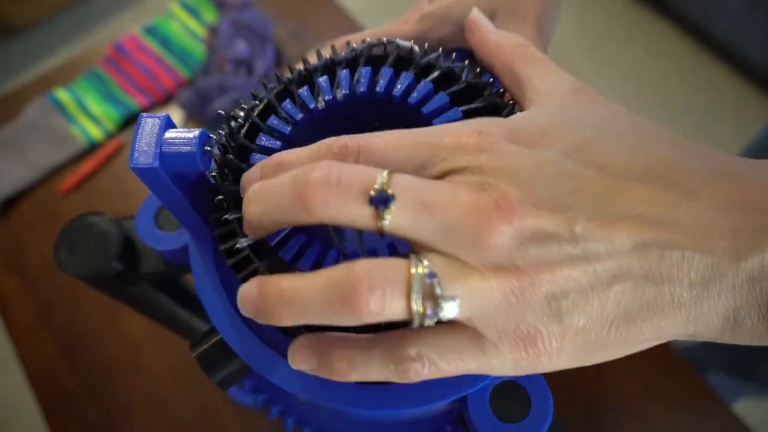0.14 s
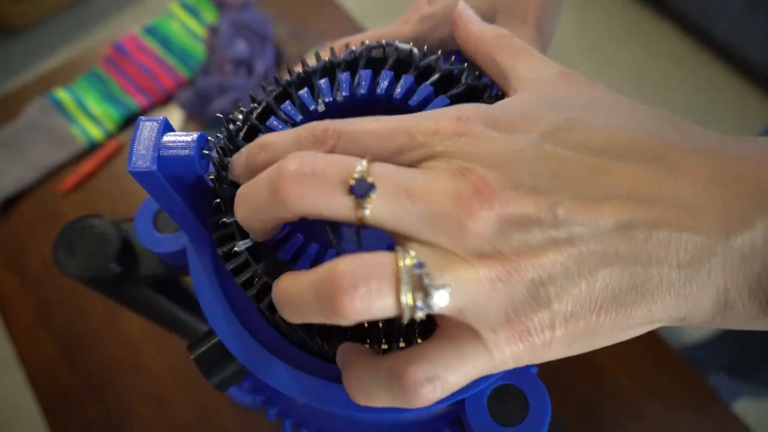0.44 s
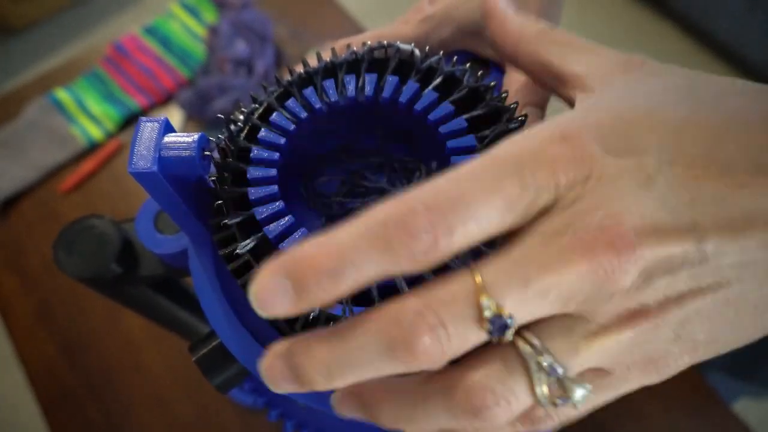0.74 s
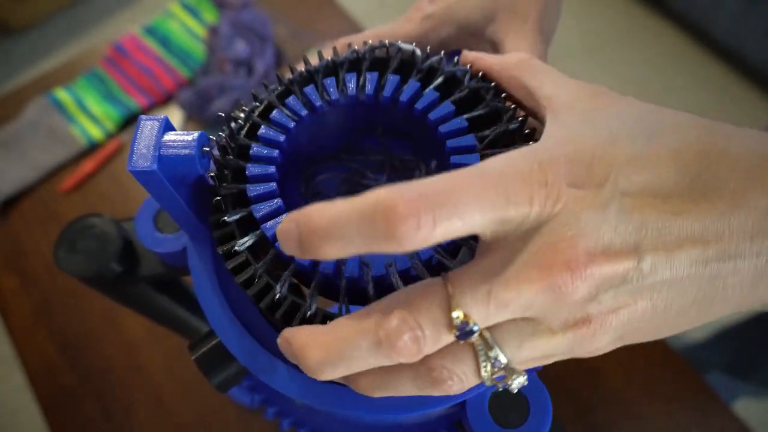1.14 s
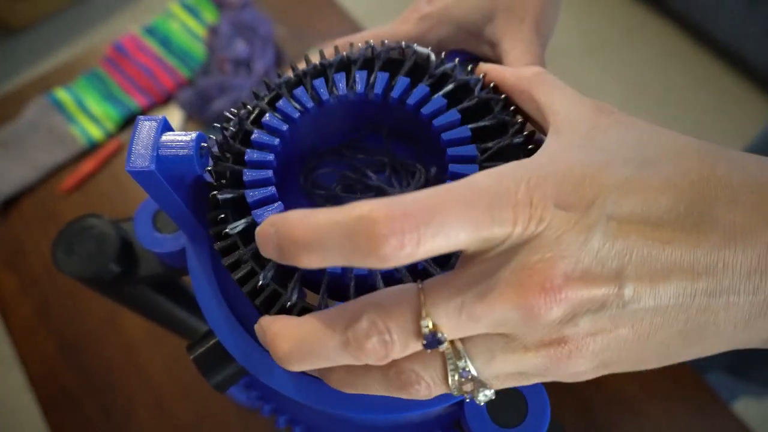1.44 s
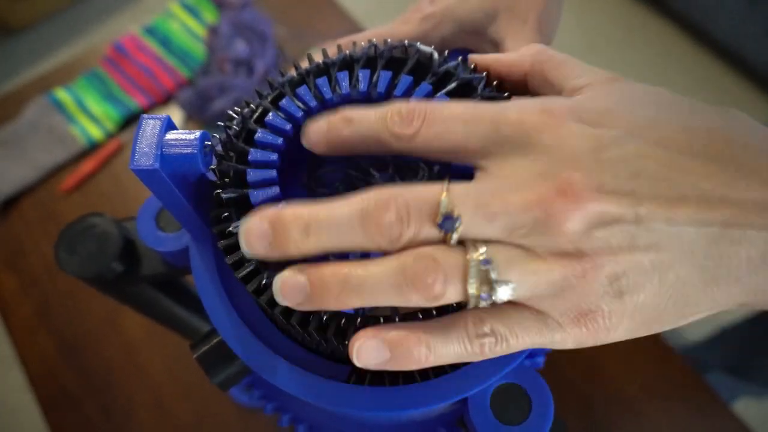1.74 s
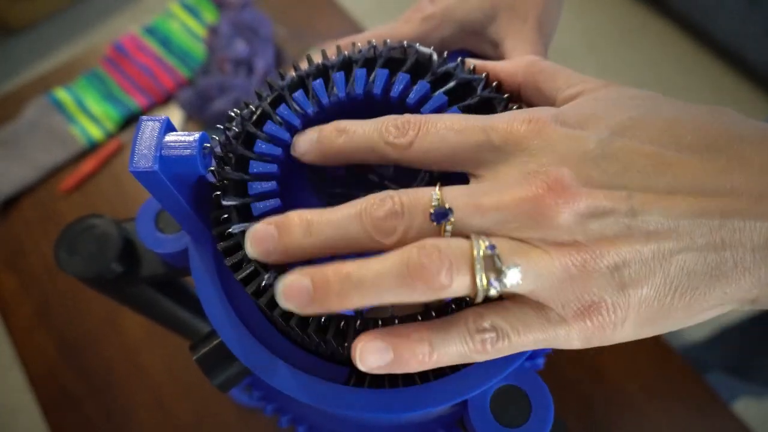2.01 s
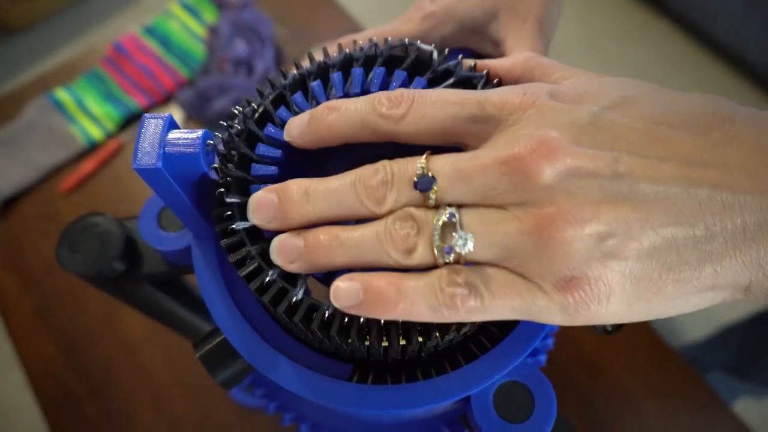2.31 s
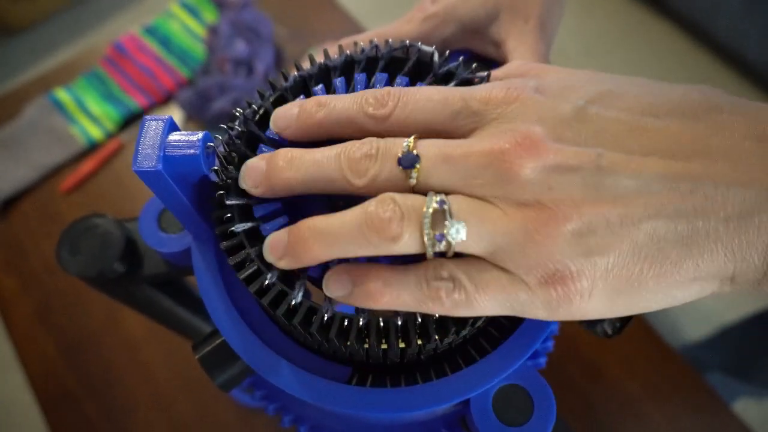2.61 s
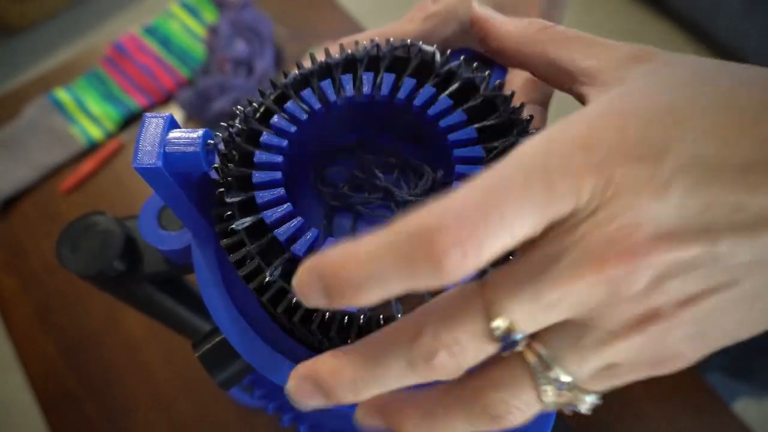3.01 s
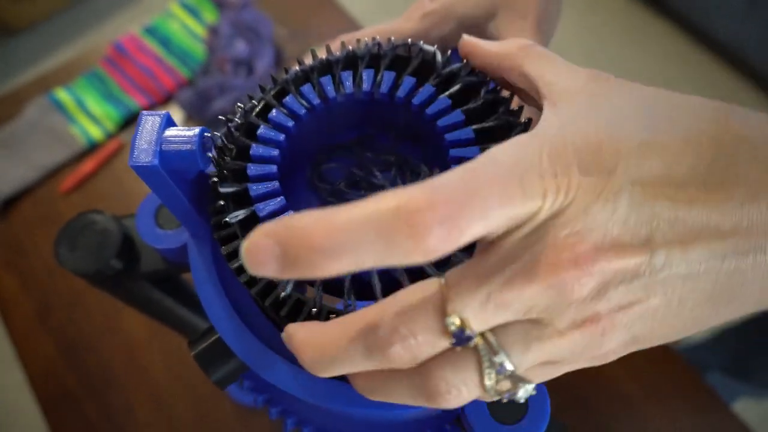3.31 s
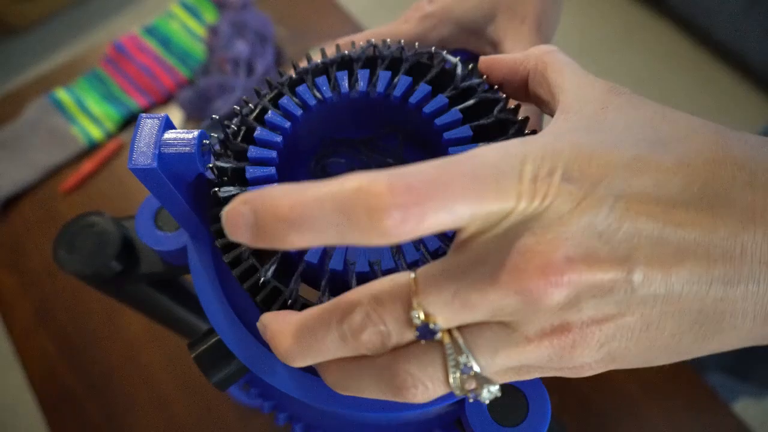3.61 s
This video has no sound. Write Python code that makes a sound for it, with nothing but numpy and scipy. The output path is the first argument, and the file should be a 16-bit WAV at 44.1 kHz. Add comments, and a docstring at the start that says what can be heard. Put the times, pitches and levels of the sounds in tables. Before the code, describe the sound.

Needles of a small plastic knitting machine click and rattle under a turning hand: one early click, a dense burst, scattered ticks, then a stronger clatter; soft table knocks, small furnished room, close phone microphone.

```python
"""A small furnished room with a wooden table, heard through a phone lying close by.
A hand turns the needle ring of a small plastic knitting machine. Needles click as short noise bursts,
rattle in swarms of random ticks, and drag in their slots as gated noise, all through tuned resonances.
The frame knocks the table top, struck as a set of decaying modes; noise echoes make the room's brief answer.
Underneath lie a quiet shaped-noise hiss, a thin whine and a low rumble that comes and goes."""
import sys
import numpy as np
from scipy import signal
from scipy.fft import rfft, irfft
from scipy.io import wavfile
from scipy.ndimage import uniform_filter1d

SR = 44100
rng = np.random.default_rng(int(sys.argv[2]) if len(sys.argv) > 2 else 0)


def generate_wav(signal):
    """Clip the signal to [-1, 1] and save it as 16-bit WAV at the path in sys.argv[1]."""
    frames = np.transpose(np.atleast_2d(signal))
    scaled = np.clip(frames, -1, 1) * 32767
    pcm = np.round(scaled).astype(np.int16)
    wavfile.write(sys.argv[1], SR, pcm)


N = 165375  # length [samples]

# Needle clicks: (time [s], slot level [dB], plastic ring level before crest trim [dB],
# treble level before crest trim [dB], pitch [Hz], ring pitch [Hz], left minus right [dB], length [ms])
NEEDLE_CLICKS = [(0.1138, -14.5, -25, -24.5, 3940, 1330, 0, 7.4),
                 (0.153, -54, -61, -45, 5000, 1450, 5, 6.7), (0.1713, -24.5, -26, -28, 3370, 1360, 2, 7.3),
                 (0.1984, -37, -51, -62, 2070, 1920, -6, 7), (0.3853, -63, -43, -57, 5020, 1580, 1, 9.3),
                 (0.417, -36, -57, -44, 4460, 1560, 3, 4.1), (0.455, -47, -41.5, -65, 3430, 1270, -1, 10),
                 (0.4998, -68, -48, -65, 3130, 1880, -3, 6.7), (0.517, -39, -49, -47, 4400, 1900, 1.0, 3.2),
                 (0.5348, -37, -39.5, -48, 4300, 1600, 0, 5.5),
                 (0.559, -47.5, -41, -70, 2520, 1800, -2, 5.9), (0.606, -50, -41, -62, 2550, 1520, 1, 8.8),
                 (0.6697, -43.5, -57, -72, 3180, 1620, 0.0, 7), (0.7015, -43, -41, -69, 4450, 1750, -1, 6),
                 (0.714, -44, -45, -50, 2660, 1500, 0, 5.1), (0.9658, -65, -33.5, -85, 2400, 1470, -5, 9.7),
                 (1.169, -36, -40.5, -50, 3500, 1370, 0, 3.3), (1.1828, -36, -44, -50, 4300, 1450, 2, 6),
                 (1.1964, -47, -63, -67, 3510, 1430, -1.0, 4.2), (1.2173, -41, -51, -63, 3560, 1390, -1, 6),
                 (1.2273, -32, -33, -48, 2960, 1320, -10, 6.2),
                 (1.238, -18.5, -48, -32, 4200, 1360, 7, 9.3), (1.257, -29, -23, -48, 2970, 1340, -6, 9),
                 (1.2693, -19, -29.5, -13, 3920, 1300, -0.5, 6.4),
                 (1.2792, -24.5, -58, -50, 3770, 1230, 12, 4.3),
                 (1.323, -30, -35, -39, 3250, 1390, 12, 8.4),
                 (1.3515, -15.5, -49, -15.5, 4100, 1900, 3, 8.5),
                 (1.3618, -26, -33, -33, 4050, 1500, -18, 7.44),
                 (1.3688, -19, -24.5, -21, 4830, 1380, 3, 6.8), (1.4043, -21, -35, -61, 3480, 1600, -2, 4),
                 (1.4726, -33.5, -46, -46, 4300, 1940, 2, 9.6),
                 (1.5212, -39.5, -48, -72, 4980, 1250, 4, 6.5),
                 (1.5845, -32, -45, -41.5, 4230, 1520, 0, 4.6),
                 (1.8138, -47.5, -41.5, -53, 2640, 1660, 0, 7.1),
                 (1.8603, -22, -38, -32.5, 3860, 1270, 0.5, 3.8), (1.91, -46, -67, -59, 3120, 1480, 5, 5.8),
                 (1.9485, -20.5, -19, -27, 3400, 1440, -2, 3.8),
                 (1.954, -20, -28.5, -18, 3780, 1230, 7.5, 4.6), (2.051, -48, -56, -49, 2740, 1530, 2, 7.3),
                 (2.074, -42, -30.5, -39, 3500, 1650, 1, 5.6),
                 (2.1856, -39, -63, -71, 3480, 1740, 1.0, 2.7),
                 (2.2127, -32.5, -39, -38.5, 4540, 1690, 0, 5),
                 (2.2367, -38.5, -40, -44, 4570, 1600, 0, 7.6),
                 (2.2745, -47.5, -45.5, -71, 4340, 1440, 0, 8.7),
                 (2.3239, -24, -35.5, -17.5, 4400, 1500, 0.5, 5.2),
                 (2.412, -48, -58, -55, 2760, 1630, -3, 8), (2.497, -33, -40, -46, 4480, 1540, 2.5, 4.6),
                 (2.5306, -38, -59, -46, 3470, 1600, 3, 6), (2.5532, -38, -37, -55, 5500, 1630, 1, 5.4),
                 (2.569, -38, -49, -37, 4400, 1540, 1.5, 6.8), (2.589, -34.5, -51, -39, 3550, 1620, 3, 6.6),
                 (2.6584, -49.5, -48, -68, 3550, 1450, -4, 8.8),
                 (2.688, -48.5, -61, -70, 3320, 1350, -0.5, 6), (2.7897, -51, -47, -68, 2710, 1690, 2, 7.1),
                 (2.8106, -33, -55, -41, 3400, 1460, 0.5, 6), (2.8285, -29, -39, -36, 4640, 1380, 1.0, 5.3),
                 (2.8702, -25, -60, -29, 4700, 1400, 1, 5.9),
                 (2.8835, -33.5, -45, -51, 2900, 1390, -1, 6.5),
                 (2.9147, -37.5, -55, -42.5, 4700, 1520, 5, 4.3),
                 (3.2204, -46, -47, -71, 3600, 1530, -5, 12), (3.272, -54, -38, -75, 2820, 1280, -4, 8.5),
                 (3.3006, -36.5, -37, -69, 3750, 1480, -4, 7), (3.327, -25, -34, -41, 4370, 1600, 0, 7),
                 (3.352, -18, -54, -11, 4500, 1540, 1, 6.8), (3.3735, -36, -58, -49, 3800, 1840, -26, 7.4),
                 (3.4356, -43, -41, -41, 3520, 1900, 3, 10.8), (3.453, -46, -31, -48, 2910, 1500, -12, 5.9),
                 (3.4731, -28.5, -41, -42, 4300, 1270, 13, 6.5),
                 (3.496, -22.5, -24.5, -41, 3680, 1360, 3, 5),
                 (3.5242, -21.5, -27.5, -34, 4100, 1320, -7.5, 4.8),
                 (3.5275, -23, -38, -18.5, 6050, 1390, -3, 3.5),
                 (3.532, -17, -45, -12.5, 4870, 1390, 5, 7.4), (3.5666, -21, -41, -36, 3800, 1440, 4, 7.4),
                 (3.5931, -13, -30, -13.5, 4060, 1600, 0.5, 6.3), (3.625, -25, -36, -32, 3870, 1630, 5, 4),
                 (3.6448, -24, -32, -47, 4770, 1500, -0.5, 9.6),
                 (3.6487, -24.5, -50, -32, 4570, 1440, 9, 7.5), (3.6702, -24, -40, -26, 4360, 1520, 0, 4.4),
                 (3.7444, -37.5, -51, -48, 3500, 1200, 3, 5.7)]
# Rattle of the needle swarm: (time [s], level [dB], treble level [dB])
SWARM_LEVELS = [(0, -60.5, -68), (.105, -61, -69), (.125, -44, -58), (.2, -62.5, -58.5), (.255, -57, -66),
                (.275, -66.5, -69), (.55, -61, -68), (.62, -65, -70), (.73, -71, -72), (.8, -79, -79),
                (1.14, -73, -70), (1.19, -57.5, -91), (1.22, -54.5, -68), (1.235, -35, -50),
                (1.26, -32, -43), (1.29, -39.5, -44), (1.315, -47, -60), (1.33, -31, -46),
                (1.385, -39, -42.5), (1.42, -44.5, -65), (1.45, -60, -66), (1.55, -66.5, -70),
                (1.65, -71, -73), (1.8, -72, -71), (1.88, -58, -65), (2.06, -60.5, -72), (2.2, -59.5, -67),
                (2.42, -64, -68), (2.58, -55.5, -67), (2.68, -69, -72), (2.78, -66, -74),
                (2.84, -53.5, -66), (2.94, -65, -66.5), (3.05, -86, -74), (3.2, -74, -74), (3.27, -64, -70),
                (3.31, -48.5, -71.5), (3.335, -41.5, -82), (3.36, -39.5, -42), (3.4, -39, -53),
                (3.43, -49.5, -69), (3.47, -35.5, -51), (3.51, -42.5, -65), (3.53, -36.5, -43),
                (3.575, -33, -40.5), (3.587, -44.5, -64), (3.61, -42, -48), (3.665, -41, -49),
                (3.685, -50.5, -61), (3.75, -63, -63)]
# Needle drags in a slot: (time [s], length [s], level [dB], treble level [dB], plastic ring level [dB])
NEEDLE_DRAGS = [(0.058, 0.036, -54.5, -60, -59.5), (0.316, 0.015, -49, -54, -52),
                (0.397, 0.048, -65, -67, -57), (0.635, 0.048, -62, -73, -59.5),
                (2.089, 0.0082, -53.5, -74, -37), (2.109, 0.026, -35, -32.5, -31.5),
                (2.124, 0.028, -40.5, -54, -61.5), (2.438, 0.016, -36, -44, -45.5),
                (2.589, 0.02, -51, -62, -50.5)]
# Knocks on the table: (time [s], level [dB], low mode share [dB], upper modes share [dB],
# dull thud share [dB])
TABLE_KNOCKS = [(0.12, -35, -4, -6.5, -15), (0.173, -35, -1, -6.5, -14), (0.199, -38.5, 28.5, -30, -37),
                (0.548, -45, -6, 0.5, -12.5), (0.664, -46.5, -13, -3, -28), (0.966, -34, -12, -5.5, -9.5),
                (0.989, -60, 0.0, 6, 8.5), (1.031, -62, 0.0, 0, 4), (1.226, -50.5, -10, 8, 3),
                (1.245, -42, -15, 9, -9), (1.267, -37, -10, -2, -25), (1.285, -38.5, 0, 3, -21),
                (1.344, -40.5, 5, 6.5, -5.5), (1.551, -53.5, -3, 5, -24), (1.95, -25, 2, -4.5, -15),
                (2.55, -45.5, -4, 1.5, -24), (2.677, -58.5, -9, 11.5, -4), (2.831, -38.5, -4, 3.5, -7.5),
                (2.891, -25.5, -12, -9.5, -23), (2.947, -33, -8, 4, -22.5), (3.332, -51, -3, 1, -6),
                (3.542, -44, -11, 7.5, 1), (3.59, -52.5, -6, 11.5, -23)]

# Slot resonances: (frequency [Hz], width [Hz], level [dB])
SLOT_BANDS = [(2855, 940, 15.5), (3358, 600, 18), (4070, 840, 12), (5070, 460, 14.5), (5510, 1640, 10.5)]
# Modes of the plastic ring: (frequency [Hz], level [dB], T60 [s])
RING_MODES = [(1371, 10, 0.037), (1486, 17.5, 0.035), (1622, 21.5, 0.015), (1866, -2.5, 0.085)]
# Treble resonances of the needles: (frequency [Hz], width [Hz], level [dB])
TREBLE_BANDS = [(7300, 260, 8), (9610, 5400, 16), (15000, 1000, 12)]
# Resonances of a drag: (frequency [Hz], width [Hz], level [dB])
DRAG_BANDS = [(2726, 220, 3), (3230, 180, 2.5), (4420, 350, -9.5), (5450, 540, 1), (6500, 380, -10)]
# Treble resonances of a drag: (frequency [Hz], width [Hz], level [dB])
DRAG_TREBLE_BANDS = [(5930, 840, -2), (8600, 720, 0), (11300, 1800, 1.5), (13900, 1200, -1)]
# Modes of the table top: (frequency [Hz], level before a knock's shares [dB], T60 when knocked [s])
TABLE_MODES = [(80, -24, 0.21), (146, -2.5, 0.26), (158, -30.5, 0.2), (223, -13, 0.15), (271, -2, 0.12),
               (296, -6.5, 0.12), (360, -12, 0.18), (449, -21.5, 0.2), (571.5, -16.5, 0.14),
               (712, -7, 0.02), (822, -5, 0.046)]

# Hiss spectrum: (frequency [Hz], relative density [dB per Hz])
HISS_SPECTRUM = [(15, -34), (25, -66), (87, -2.5), (180, -6.5), (439, -9.5), (531, -14), (734, -13),
                 (1330, -17), (1940, -17.5), (2220, -20), (16000, -31)]
# Stereo width of the hiss: (frequency [Hz], side minus mid [dB])
HISS_WIDTH = [(60, -4), (110, -8.5), (200, -2.5), (380, 0), (700, 3), (1290, 2.5), (2380, 0.5), (4400, 1),
              (8120, 1), (15000, 1)]
# Low rumble: (time [s], level [dB])
RUMBLE_LEVELS = [(0.0, -60), (0.07, -65), (0.12, -39), (0.22, -46.5), (0.28, -55.5), (0.66, -66),
                 (0.69, -53), (0.92, -70), (1.4, -58), (1.6, -71), (2.0, -51), (2.16, -62), (2.28, -52.5),
                 (2.43, -73), (2.64, -52), (2.79, -68), (2.84, -52), (2.98, -41), (3.05, -61),
                 (3.75, -62.5)]

# Clicks; the time constants of the envelope and its peak are shares of a click's length
CLICK_WIDTH_HZ, CLICK_SLOTS_DB, CLICK_CREST_DB = 850, -3, -4
CLICK_SIDE_DB, TREBLE_SIDE_DB = -9, -3
RISE_SHARE, FALL_SHARE, PEAK_SHARE, PEAK_DB = 0.22, 0.34, 0.032, -7
PLATEAU_DB = -1.5  # flat top of the envelope under its peak
LEAD_S, CLICK_SAMPLES = 0.012, 4096  # room for the rise before the peak; whole buffer

# Ticks of the swarm
TICKS_PER_S, TICK_SCATTER_DB = 5700, 3
CLUSTER_MS, CLUSTER_DB = 3.7, 1
STRAYS_PER_S, STRAY_DB, STRAY_SCATTER_DB = 350, -1, 4  # lone hard ticks
STRAYS_FROM_DB = -61.5  # rattle level where the strays reach half strength
RATTLE_RING_HZ, RATTLE_SELECT_HZ, RATTLE_SPREAD_DB = 1415, 230, 3.5
RING_SELECT_HZ = 175  # distance at which a ring mode is 10 dB down

# Plastic ring, frame and table: level at a rattle of -40 dB, and dB gained per dB of rattle
RING_DB, RING_FOLLOWS = -48.5, 0.98
FRAME_DB, FRAME_FOLLOWS = -55, 0.82
SHAKE_DB, SHAKE_FOLLOWS = -51.5, 0.56
FRAME_HZ = 744  # dull body of the plastic frame
# A higher ring mode follows the rattle at this offset, up to a ceiling on the rattle level
SOFT_RING_HZ, SOFT_RING_DB, SOFT_TOP_DB = 1670, -6, -58

DRAG_RING_HZ, DRAG_FRAME_DB, DRAG_SCATTER_DB, DRAG_EDGE_S = 1726, -19, 1.5, 0.0034
PUSH_MS, KNOCK_SCATTER_DB = 0.98, 1
EDGE_MODES_DB = 10.5  # table modes above 400 Hz, relative to the dull thud's share
THUD_HZ, THUD_T60_S = 640, 0.15

ECHO_TURNS_PER_S = 9  # RMS rate of the blend between two room responses
ROOM_T60_S, ROOM_DULL_HZ, EARLY_T60_S = 0.27, 7000, 0.07
ROOM_DB, EARLY_DB, ROOM_SIDE_HZ = -6, -9, 1540
HISS_DB = -60  # mid level above 100 Hz
RUMBLE_HZ, WHINE_HZ, WHINE_DB = 42, 10550, -81
TOP_HZ = 16100


def undb(db):
    """Decibels to an amplitude factor."""
    return 10 ** (np.asarray(db, float) / 20)


def unit(x):
    """Scale to an RMS of 1."""
    return x / np.sqrt(np.mean(x ** 2) + 1e-30)


def click_peak(x):
    """Scale so that the loudest 40-sample stretch has the RMS of a full-scale sine."""
    return x / np.max(uniform_filter1d(x ** 2, size=40)) ** .5 / np.sqrt(2)


def balance(left_minus_right_db):
    """Left and right gains for a level difference, as a column."""
    return undb([[left_minus_right_db / 2], [-left_minus_right_db / 2]])


def curve(table, column=1):
    """Automation line through a table's points."""
    table = np.array(table)
    return np.interp(np.arange(N) / SR, table[:, 0], table[:, column])


def band(x, hz, width_hz):
    """One resonance, gain 1 at its centre."""
    return signal.lfilter(*signal.iirpeak(min(hz, .45 * SR), hz / width_hz, fs=SR), x)


def twice(x, hz, width_hz):
    """A steeper resonance: two in series, the second twice as wide."""
    return band(band(x, hz, width_hz), hz, 2 * width_hz)


def bank(x, bands, alternate=False):
    """Parallel resonances, with every other one inverted on request."""
    sign = -1 if alternate else 1
    return sum(sign ** k * undb(db) * twice(x, hz, width) for k, (hz, width, db) in enumerate(bands))


def ring(x, hz, t60):
    """One mode struck by x: a decaying sine from a complex pole."""
    pole = np.exp(2j * np.pi * hz / SR - np.log(1000) / (t60 * SR))
    return signal.lfilter([1], [1, -pole], x).imag


def colours(x, ring_hz=None, select_hz=RING_SELECT_HZ):
    """Contacts excite the slots, the plastic ring (most of all near ring_hz) and the needles' treble."""
    slots = bank(x, SLOT_BANDS, alternate=True)
    body = 0
    for hz, db, t60 in RING_MODES:
        drop_db = 10 * ((hz - ring_hz) / select_hz) ** 2 if ring_hz else 0
        body = body + undb(db - drop_db) * ring(x, hz, t60)
    body = twice(body, 1350, 1110)
    treble = bank(x, TREBLE_BANDS, alternate=True)
    return slots, body, treble


def ticks():
    """Dense random contacts, some harder than the rest, bunched in small clusters."""
    hold = int(CLUSTER_MS * SR / 1000)
    bunch = uniform_filter1d(np.repeat(rng.standard_normal(N // 40), hold)[:N], hold)
    hardness = undb(TICK_SCATTER_DB * rng.exponential(size=N) + CLUSTER_DB * bunch)
    return (rng.random(N) < TICKS_PER_S / SR) * rng.choice([-1, 1], N) * hardness


def clicks():
    """Each click is a short noise burst with a two-sided envelope and a sharp peak; its treble is wide."""
    out = np.zeros((2, N + CLICK_SAMPLES))
    t = np.arange(CLICK_SAMPLES) / SR
    for s, db, body_db, treble_db, hz, ring_hz, pan_db, ms in NEEDLE_CLICKS:
        noise, roughness, side_noise = rng.standard_normal((3, CLICK_SAMPLES))
        u = (t - LEAD_S) / (ms / 1000)
        envelope = np.minimum(np.exp(np.minimum(u / RISE_SHARE, -u / FALL_SHARE)), undb(PLATEAU_DB))
        envelope = envelope + undb(PEAK_DB) * np.exp(-np.abs(u) / PEAK_SHARE)
        envelope = envelope * undb(2 * roughness)
        burst = noise * envelope
        slots, body, treble = colours(burst, ring_hz)
        side_slots, _, side_treble = colours(side_noise * envelope)

        pitched = click_peak(twice(burst, hz, CLICK_WIDTH_HZ))
        own = click_peak(pitched + undb(CLICK_SLOTS_DB) * click_peak(slots))
        own = own + undb(CLICK_SIDE_DB) * click_peak(side_slots) * [[1], [-1]]
        treble = click_peak(treble) + undb(TREBLE_SIDE_DB) * click_peak(side_treble) * [[1], [-1]]

        x = undb(db) * own
        x = x + undb(body_db + CLICK_CREST_DB) * click_peak(body)
        x = x + undb(treble_db + CLICK_CREST_DB) * treble
        start = int((s + ms / 6000 - LEAD_S) * SR)  # the peak falls a sixth of the length after s
        out[:, start:start + CLICK_SAMPLES] += x * balance(pan_db)
    return out[:, :N]


def stray_ticks(rattle_db):
    """Lone hard contacts, each a tiny noise burst, held back while the rattle is soft."""
    hardness = undb(STRAY_SCATTER_DB * np.minimum(rng.exponential(size=N), 3))
    hits = (rng.random(N) < STRAYS_PER_S / SR) * hardness
    bursts = uniform_filter1d(hits, size=30) * rng.standard_normal(N)
    return undb(STRAY_DB) * unit(bursts) * np.clip((rattle_db - STRAYS_FROM_DB) / 10 + .5, .2, 1)


def rattle():
    """Needles tick at random, each slot size on its own, strays in all at once; ring and frame follow."""
    db, treble_db = curve(SWARM_LEVELS), curve(SWARM_LEVELS, column=2)
    out = 0
    for lean_db in (RATTLE_SPREAD_DB, -RATTLE_SPREAD_DB):  # one swarm leans left, one right
        stray = stray_ticks(db)
        _, body, treble = colours(unit(ticks()) + stray, RATTLE_RING_HZ, RATTLE_SELECT_HZ)
        slots = sum(undb(g) * twice(unit(ticks()) + stray, hz, w) for hz, w, g in SLOT_BANDS)
        x = unit(slots) * undb(db) + unit(treble) * undb(treble_db)
        x = x + unit(body) * undb(RING_DB + RING_FOLLOWS * (db + 40))
        out = out + x * balance(lean_db) / np.sqrt(2)
    frame = unit(twice(ticks(), FRAME_HZ, 700)) * undb(FRAME_DB + FRAME_FOLLOWS * (db + 40))
    soft_ring = unit(colours(ticks(), SOFT_RING_HZ)[1])
    return out + frame + soft_ring * undb(SOFT_RING_DB + np.minimum(db, SOFT_TOP_DB))


def scrapes():
    """Fine, even stick-slip noise for the length of each drag, in a few narrow resonances."""
    t = np.arange(N) / SR
    x = rng.standard_normal(N) * undb(DRAG_SCATTER_DB * rng.exponential(size=N))

    def gate(column):
        out = 0
        for drag in NEEDLE_DRAGS:
            to_edge = np.minimum(t - drag[0], drag[0] + drag[1] - t)
            out = out + undb(drag[column]) * np.clip(to_edge / DRAG_EDGE_S, 0, 1)
        return out

    def body(v):
        return colours(v, DRAG_RING_HZ)[1]

    # the slot and ring resonances ring on past the gate; frame and treble are gated last
    slot = bank(x * gate(2), DRAG_BANDS) / np.std(bank(x, DRAG_BANDS))
    plastic = body(x * gate(4)) / np.std(body(x))
    frame = undb(DRAG_FRAME_DB) * unit(twice(x, FRAME_HZ, 550)) * gate(4)
    treble = unit(bank(x, DRAG_TREBLE_BANDS)) * gate(3)
    return slot + plastic + frame + treble


def knocks():
    """A soft push excites the table modes in each knock's own shares; a dull thud of the hand joins in."""
    push = np.hanning(int(PUSH_MS * SR / 1000) + 2)
    out = 0
    for hz, mode_db, t60 in TABLE_MODES:
        blows = np.zeros(N)
        for s, db, low_db, upper_db, thud_db in TABLE_KNOCKS:
            if hz < 100:
                share_db = low_db
            elif hz < 180:
                share_db = 0
            elif hz < 400:
                share_db = upper_db
            else:
                share_db = thud_db + EDGE_MODES_DB
            scatter_db = KNOCK_SCATTER_DB * rng.standard_normal()
            blows[int(s * SR)] = undb(db + mode_db + share_db + scatter_db)
        out = out + ring(signal.fftconvolve(blows, push / push.sum())[:N], hz, t60)
    blows = np.zeros(N)
    for s, db, _, _, thud_db in TABLE_KNOCKS:
        blows[int(s * SR)] = undb(db + thud_db)
    fade = signal.lfilter([1], [1, -undb(-60 / THUD_T60_S / SR)], blows)
    out = out + fade * unit(twice(rng.standard_normal(N), THUD_HZ, 960))
    return signal.sosfilt(signal.butter(4, 60, "high", fs=SR, output="sos"), out)


def table_shake():
    """The table shakes a little with the rattle: ticks ring its modes from the fourth up, at half the T60."""
    contacts = ticks()
    modes = sum(undb(g) * ring(contacts, hz, t60 / 2) for hz, g, t60 in TABLE_MODES[3:])
    return unit(modes) * undb(SHAKE_DB + SHAKE_FOLLOWS * (curve(SWARM_LEVELS) + 40))


def room(x):
    """Quick early echoes, then a duller tail; left and right differ in the treble."""
    t = np.arange(SR // 2) / SR

    def fade(t60):
        noise = rng.standard_normal((2, len(t))) * undb(-60 * t / t60)
        return unit(noise * (t > .002)) / np.sqrt(len(t))  # 2 ms before the first echo

    late = signal.lfilter(*signal.butter(1, ROOM_DULL_HZ, fs=SR), fade(ROOM_T60_S))
    mid, side = undb(EARLY_DB) * fade(EARLY_T60_S) + undb(ROOM_DB) * late
    side = signal.lfilter(*signal.butter(1, ROOM_SIDE_HZ, "high", fs=SR), side)
    echoes = np.array([mid + side, mid - side]) / np.sqrt(2)
    return signal.fftconvolve(x.mean(axis=0)[None], echoes, axes=1)[:, :N]


def drifting_echoes(x):
    """A wandering angle blends two random room responses, so the echoes' colour keeps changing."""
    wander = unit(uniform_filter1d(rng.standard_normal(N), size=2000))
    turn = 2 * np.pi * ECHO_TURNS_PER_S * np.cumsum(wander) / SR
    return np.cos(turn) * room(x) + np.sin(turn) * room(x)


def hiss():
    """Steady noise shaped in the spectrum, as mid and side signals."""
    log_hz = np.log(np.maximum(np.arange(N // 2 + 1) * SR / N, 1))

    def shape(table):
        table = np.array(table)
        return undb(np.interp(log_hz, np.log(table[:, 0]), table[:, 1]))

    mid, side = (rfft(rng.standard_normal(N)) * shape(HISS_SPECTRUM) for _ in range(2))
    scale = undb(HISS_DB) / np.std(irfft(mid * (log_hz > np.log(100)), N))
    return irfft(mid, N) * scale, irfft(side * shape(HISS_WIDTH), N) * scale


def whine():
    """A thin, steady whine: noise in one very narrow band."""
    return undb(WHINE_DB) * unit(band(rng.standard_normal(N), WHINE_HZ, 50))


def rumble():
    """Low band noise that comes and goes."""
    low = band(band(rng.standard_normal(N), RUMBLE_HZ, 81), RUMBLE_HZ, 81)
    return unit(low) * undb(curve(RUMBLE_LEVELS))


def floor():
    """Stereo hiss with a centred whine and rumble, cut below 26 Hz."""
    mid, side = hiss()
    mid = mid + whine() + rumble()
    return signal.lfilter(*signal.butter(2, 26, "high", fs=SR), [mid + side, mid - side])


def scene():
    """The needles and their echoes, over the table and the background."""
    needles = clicks() + rattle() + scrapes()
    return needles + drifting_echoes(needles) + knocks() + table_shake() + floor()


def record(dry):
    """The phone cuts the top with a steep low-pass."""
    return signal.sosfilt(signal.ellip(10, .2, 80, TOP_HZ, fs=SR, output="sos"), dry)


dry = scene()
out = record(dry)
generate_wav(out)
```